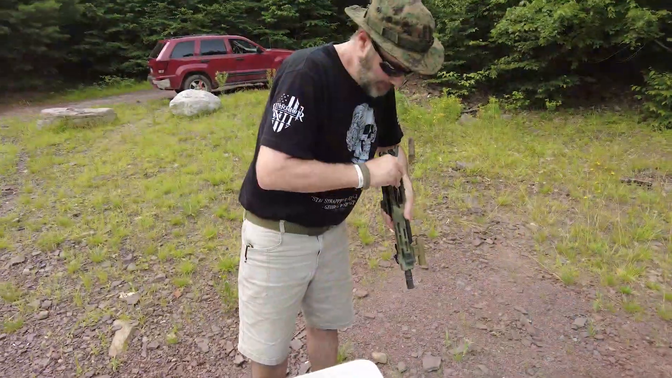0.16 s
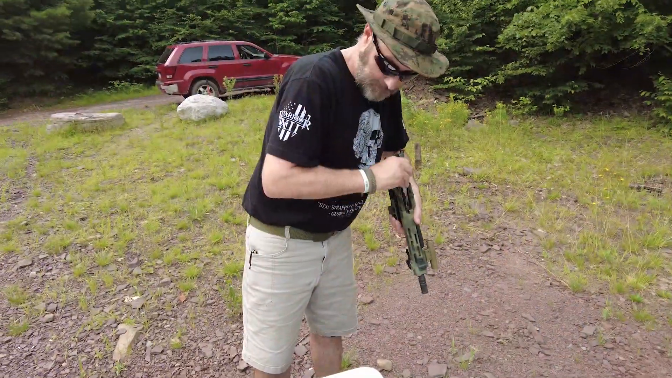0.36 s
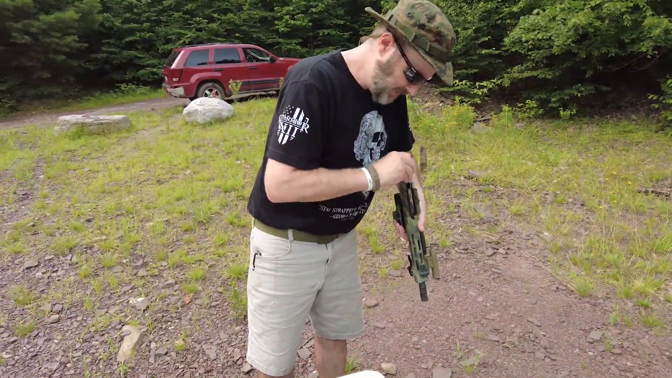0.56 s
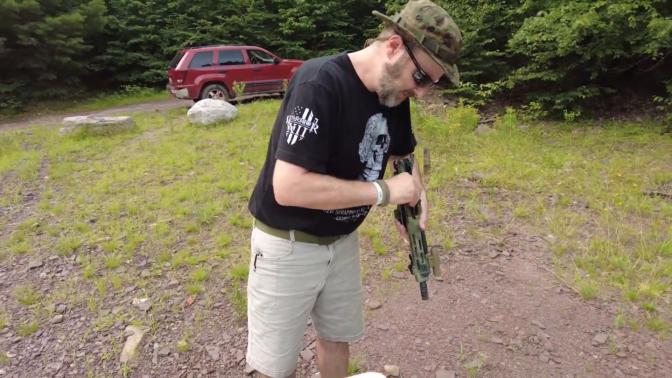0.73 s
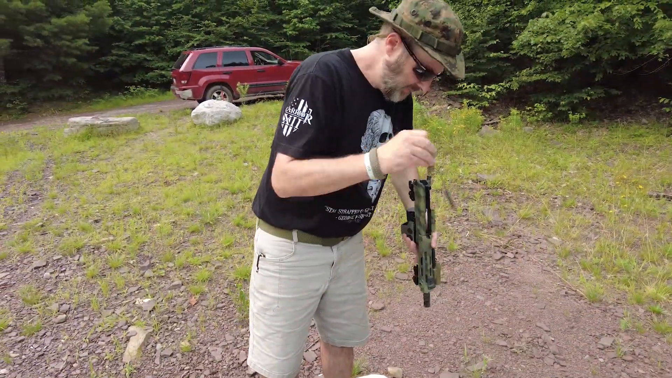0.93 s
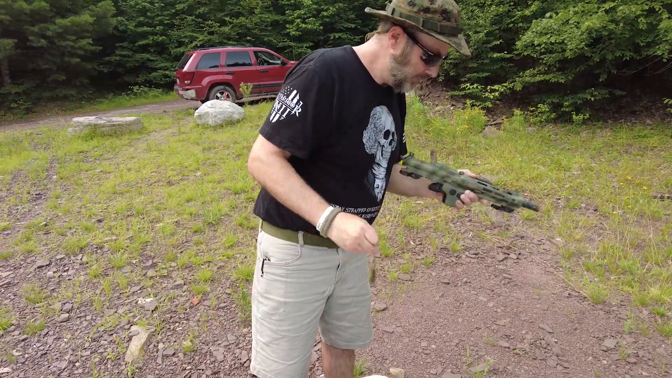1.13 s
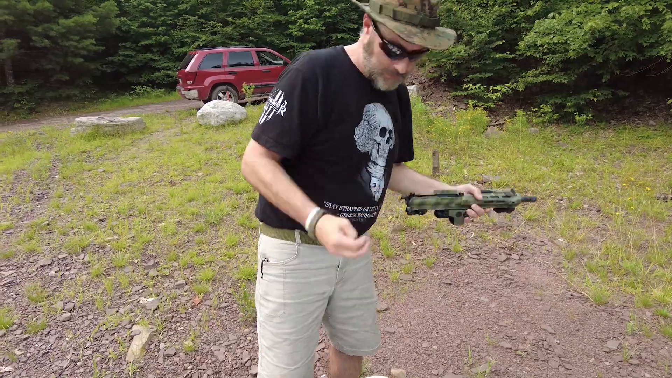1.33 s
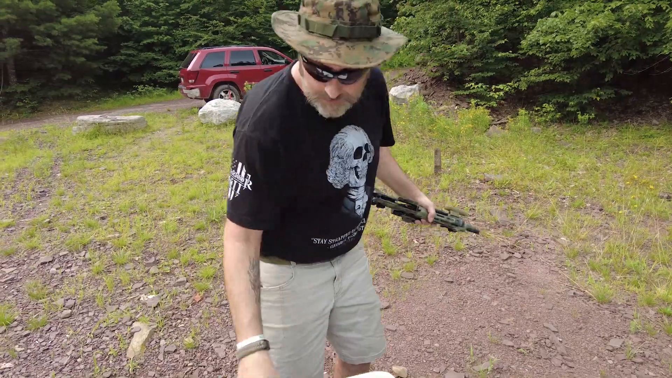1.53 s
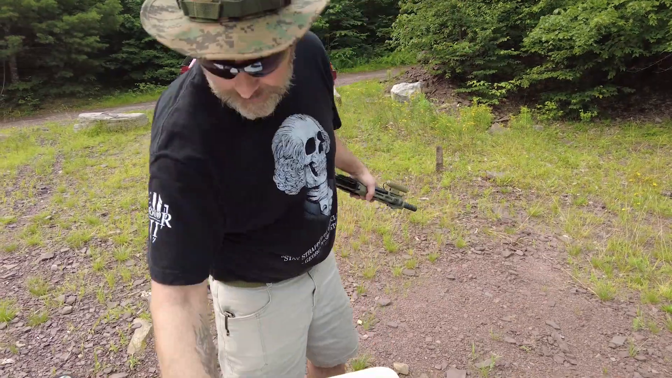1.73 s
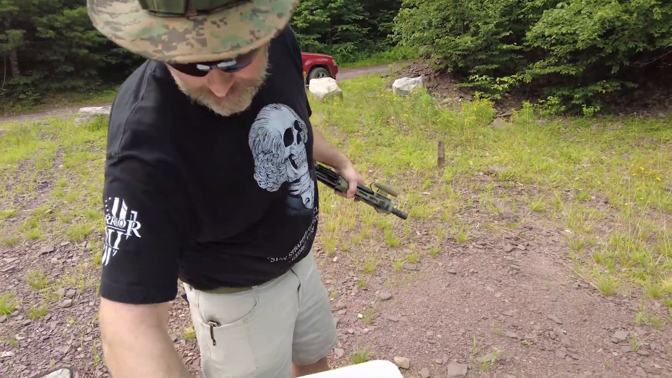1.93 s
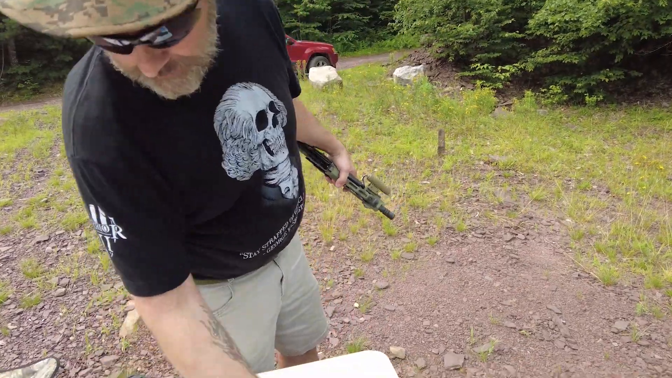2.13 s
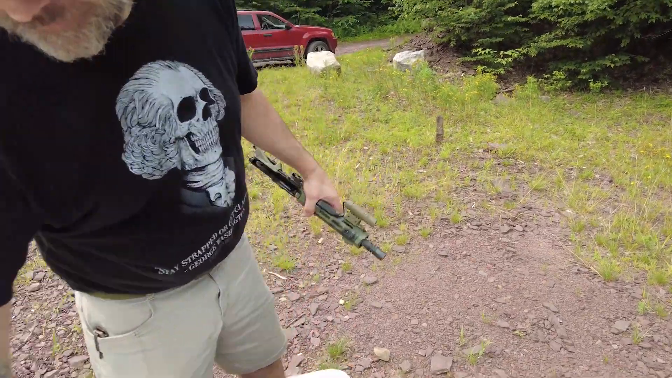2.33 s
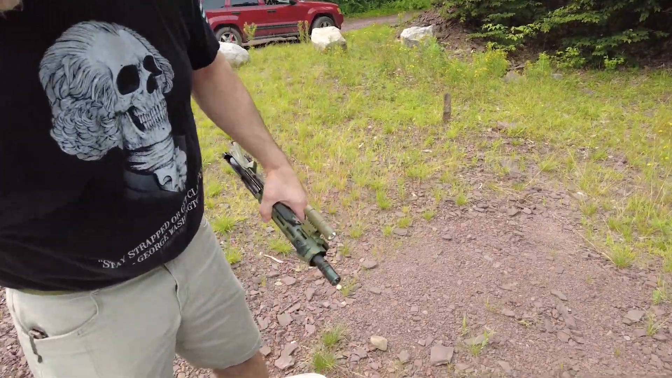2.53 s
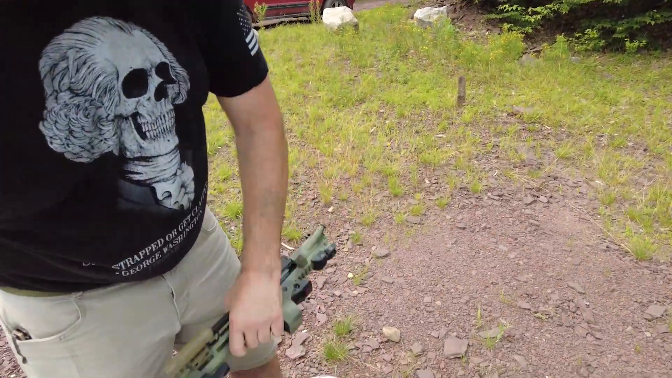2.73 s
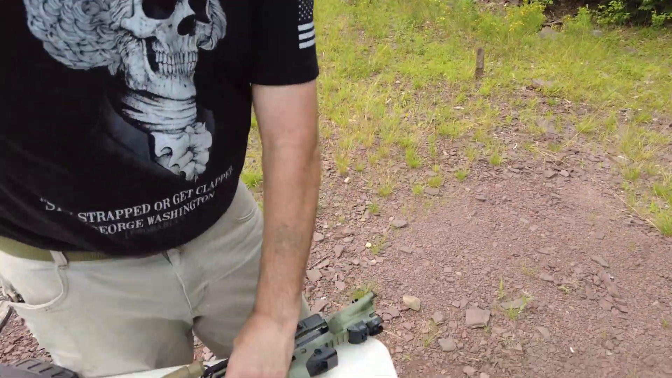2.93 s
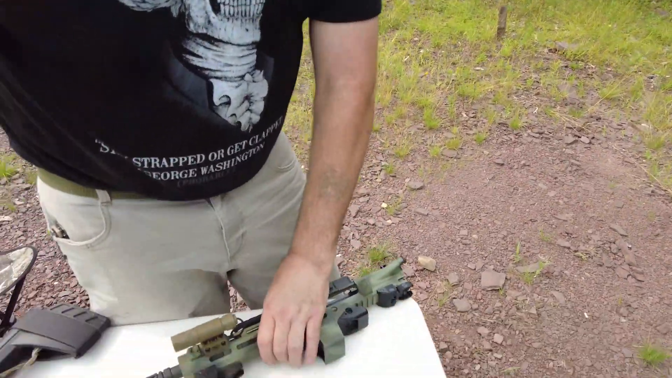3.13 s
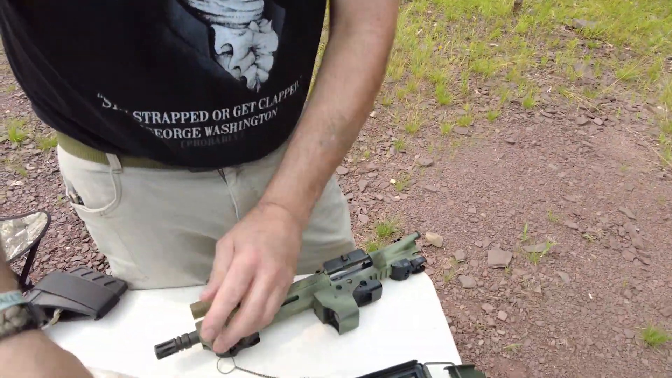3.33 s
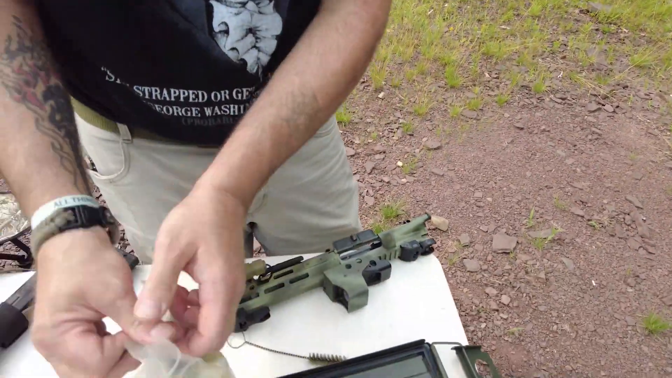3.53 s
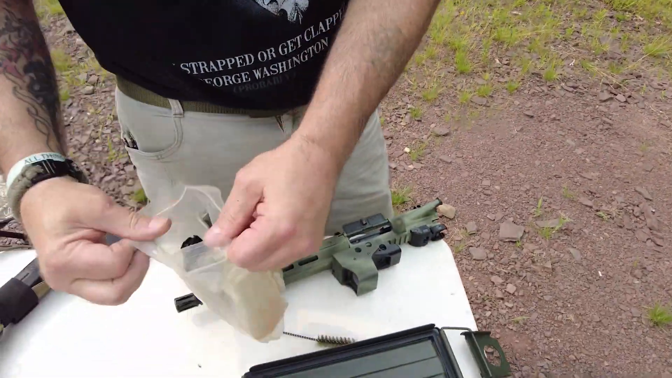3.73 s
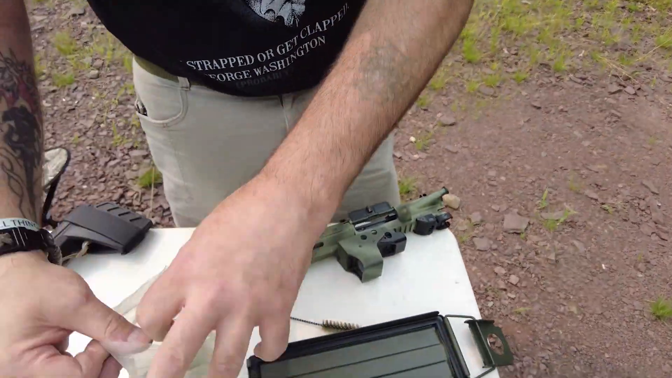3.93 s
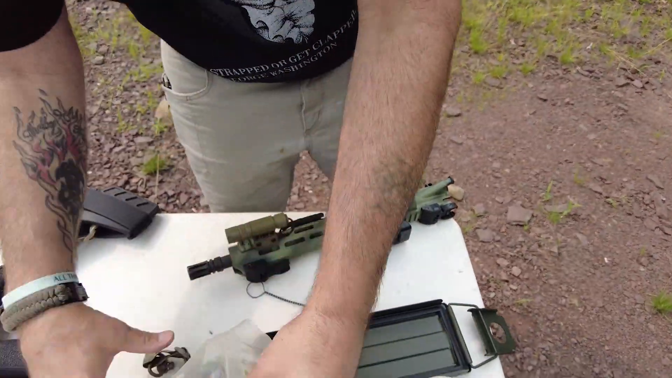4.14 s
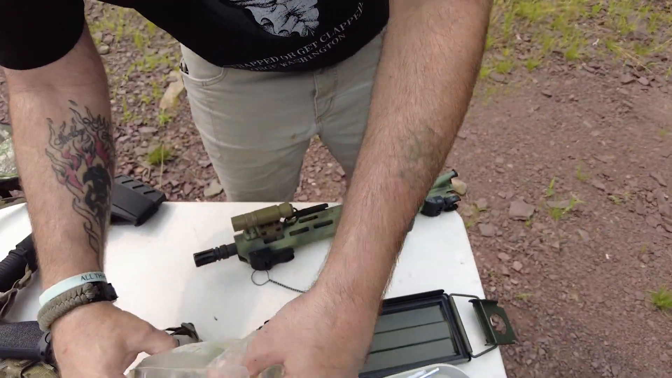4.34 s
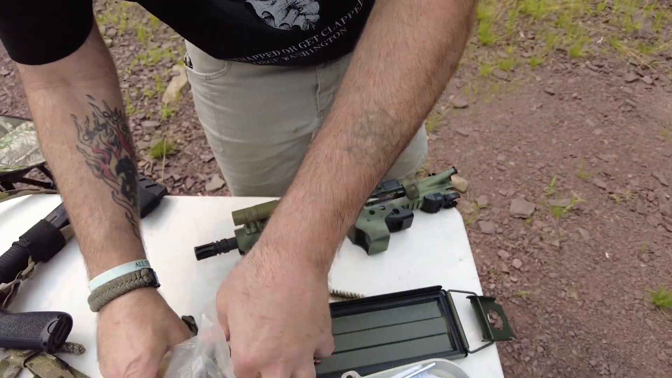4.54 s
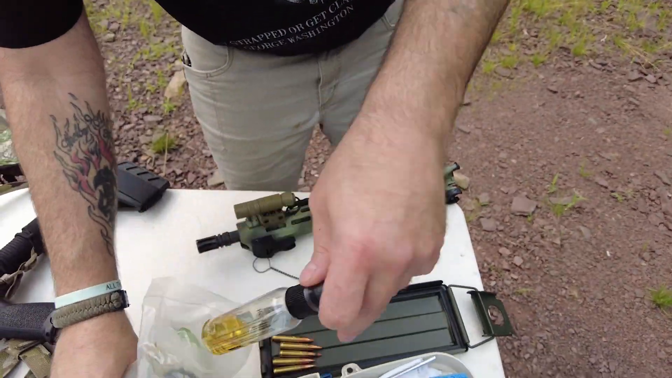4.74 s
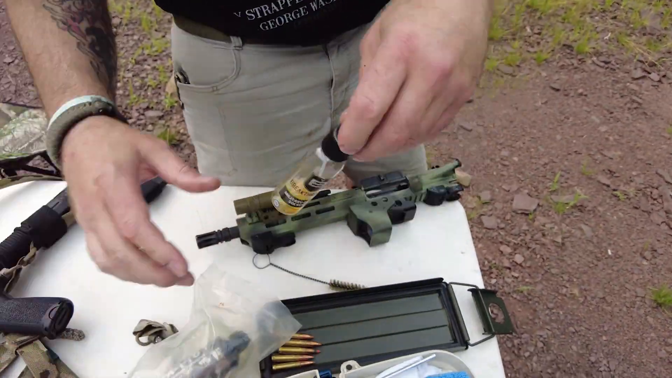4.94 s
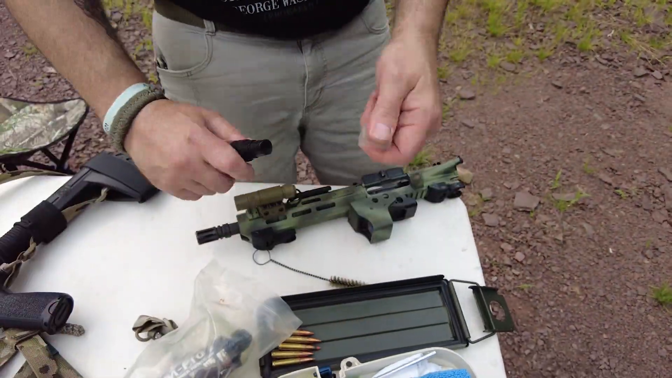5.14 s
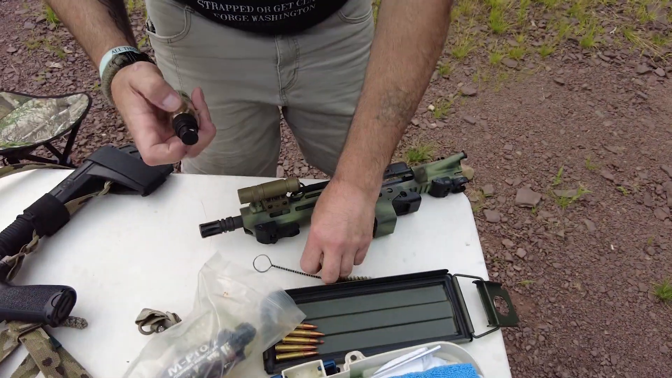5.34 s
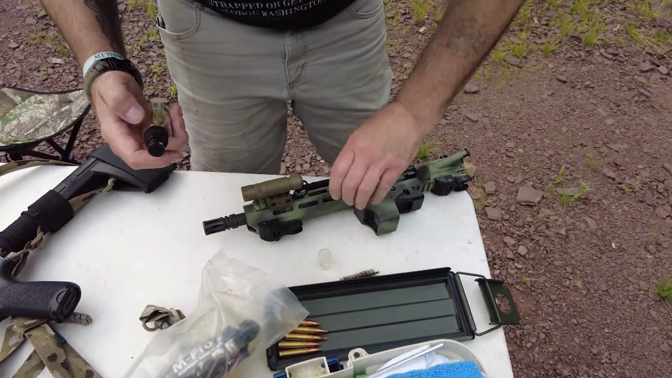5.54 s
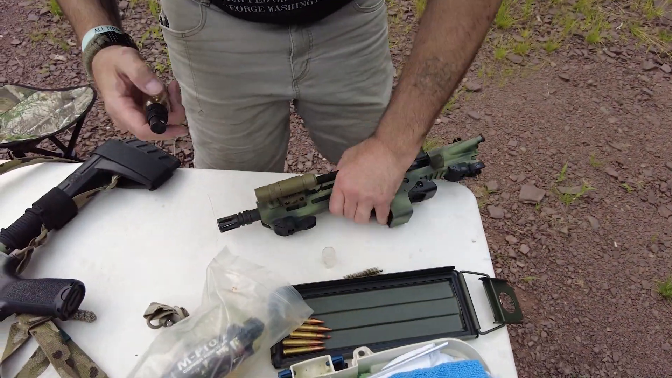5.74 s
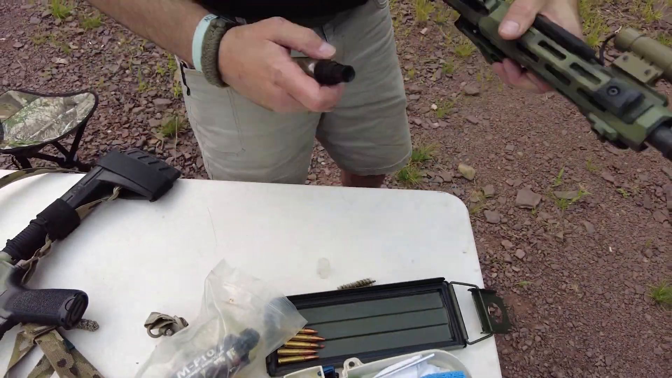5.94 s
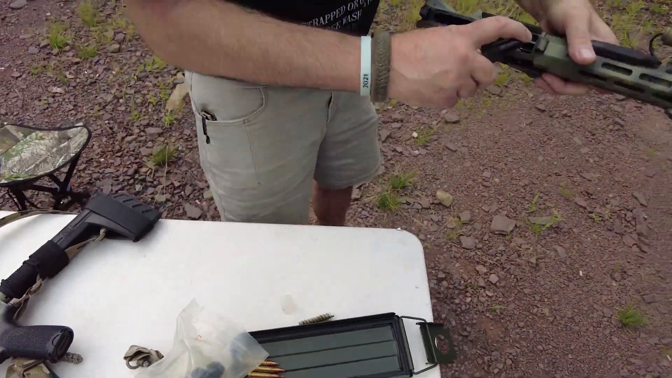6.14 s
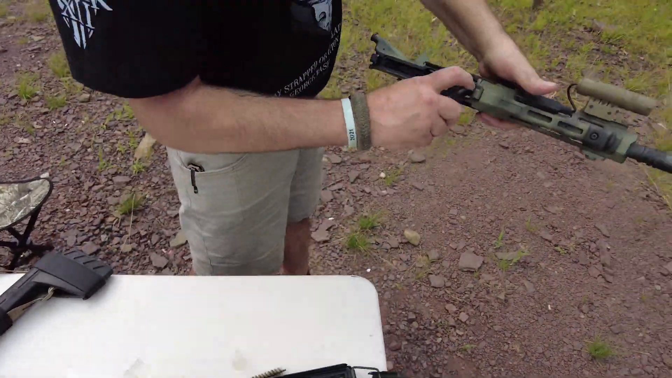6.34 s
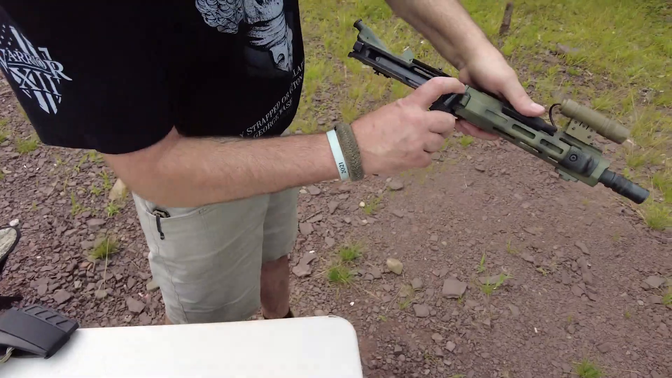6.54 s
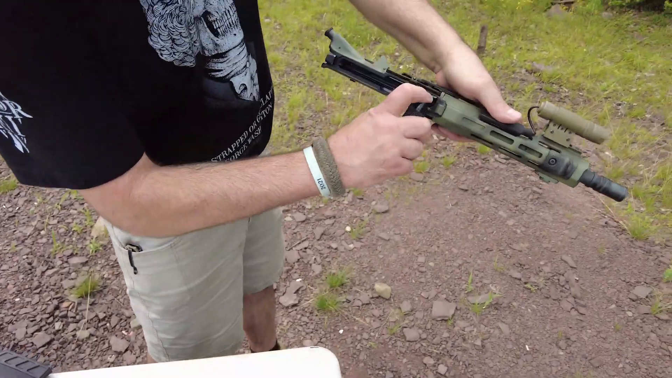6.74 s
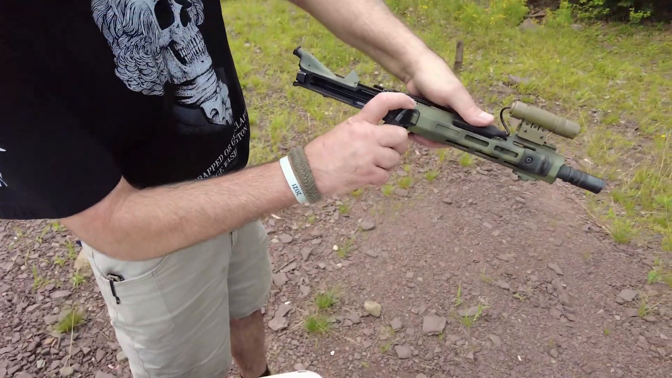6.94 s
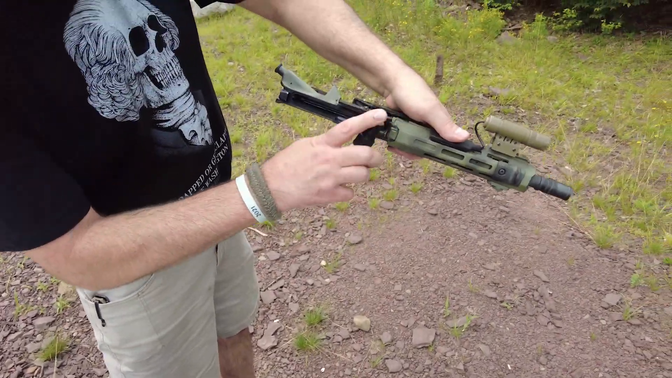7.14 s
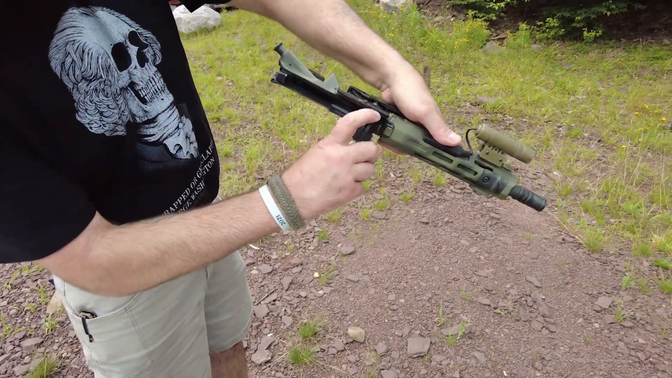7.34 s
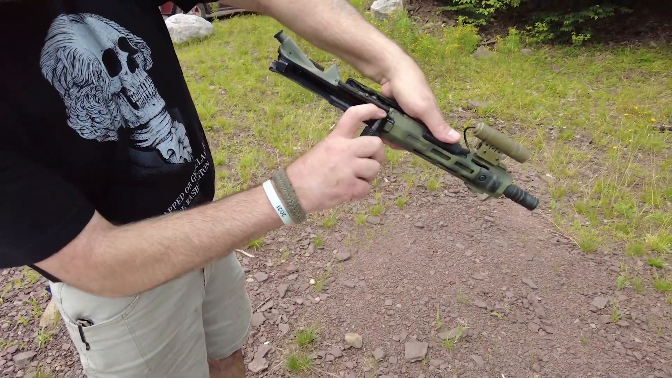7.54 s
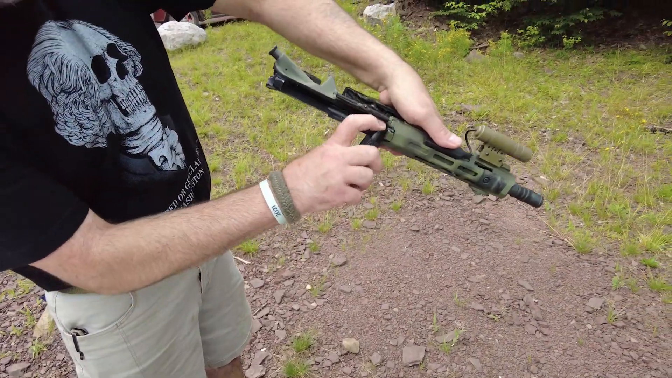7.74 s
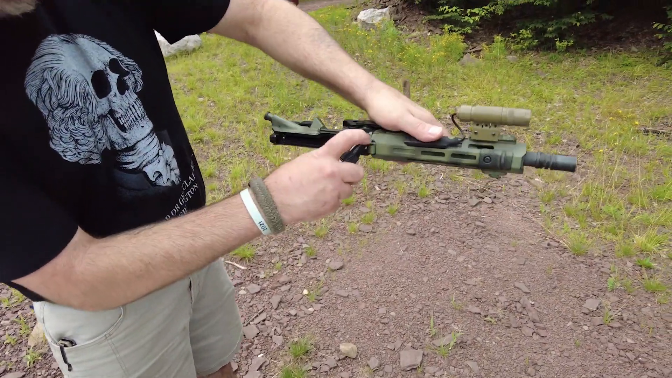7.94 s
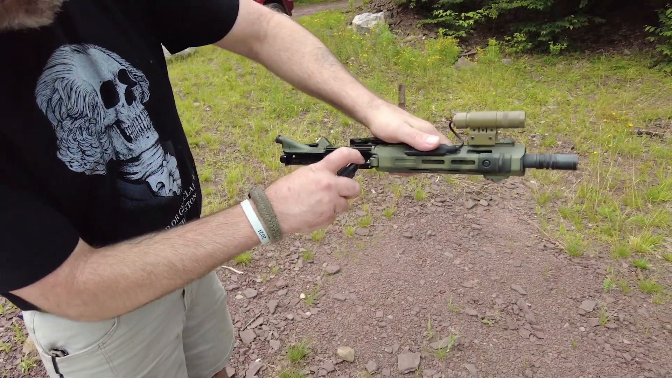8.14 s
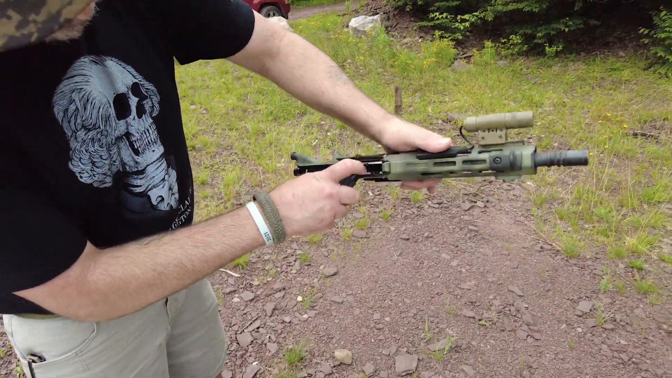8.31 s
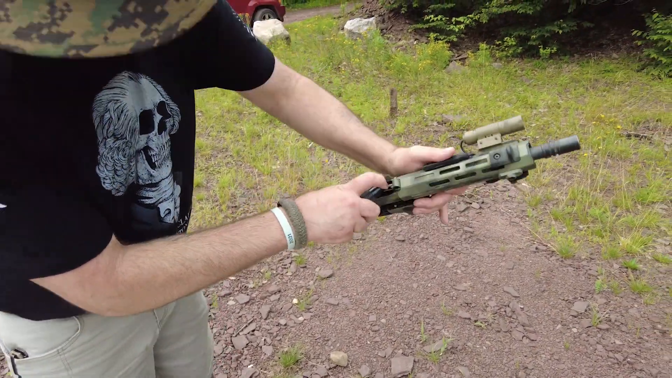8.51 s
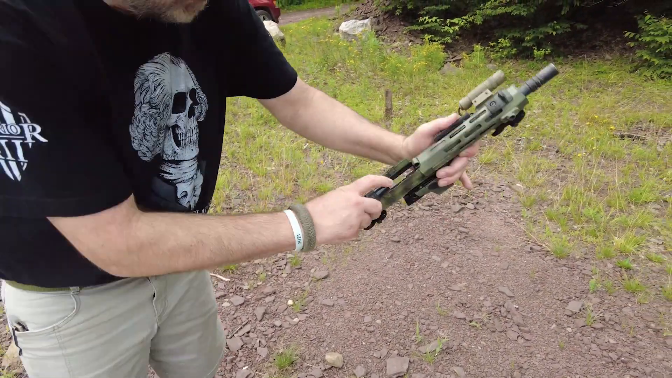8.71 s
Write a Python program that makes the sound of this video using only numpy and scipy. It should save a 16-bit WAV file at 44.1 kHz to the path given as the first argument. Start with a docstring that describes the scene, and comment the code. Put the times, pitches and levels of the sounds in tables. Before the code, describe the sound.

Outdoors, dry and close, a restless low rumble and thin hiss lie quietly beneath everything. From 0.1 to 1 s, rifle steel gives small ticks and thin short rings, clearest around 0.75 s. At 1.6 s a box and gear knock hollowly in a quick cluster; scrapes, pitched taps and further knocks continue to 2.9 s. Around 2.95-3.2 s the rifle is set down: a rapid run of booming table thumps, hard knocks and metallic rattles. Some dragging follows, then from 3.5 to 4.4 s a plastic bag pops, snaps and crinkles, with a last snap at 4.65 s amid rubbing. Steel clinks at 5.0 and 5.2 s; a firm knock and table thump come at 5.4 s. After near quiet, soft short oil puffs run irregularly from 6.7 to 8.5 s, with a bright steel click at 6.8 s and faint ticks until 8.8 s.

```python
"""Outdoors, close to a camera's two microphone ports: a man works on a rifle at a plastic folding table.
Underneath lie a low rumble and a faint hiss, both filtered noise. Hands and cloth rub as grainy noise and tiny slips.
A box and gear knock, a plastic bag pops and crackles, and the table top booms: noise bursts and ringing modes.
The rifle's steel ticks and rings its receiver; a small pump bottle squirts oil in short puffs of noise."""
import sys
import numpy as np
from scipy import signal
from scipy.fft import rfft, irfft, next_fast_len
from scipy.io import wavfile
from scipy.ndimage import uniform_filter1d, map_coordinates

SR = 44100
rng = np.random.default_rng(int(sys.argv[2]) if len(sys.argv) > 2 else 0)


def wav_out(sig):
    """Save sig, one row per channel (or a flat mono array), as 16-bit PCM at SR to the path in sys.argv[1]."""
    wavfile.write(sys.argv[1], SR, np.round(np.clip(np.atleast_2d(sig).T, -1, 1) * 32767).astype(np.int16))


N = 391166
T = np.arange(SR // 4) / SR  # time axis of one short sound [s]
TOP_HZ = 16100  # the camera's band limit
STROKE_ATTACK_S, STROKE_RELEASE_S = 0.0086, 0.12  # time to full pressure; time to die by 60 dB
FIDGET_SCRAPE_DB, FIDGET_RUSTLE_DB = -2, -13.5  # relative to FIDGETING

# Event levels below are nominal: the source functions trim and balance the parts of each sound.
# steel on steel in the action: (time [s], ring level [dB], tick level [dB])
STEEL_TICKS = [(0.086, -65, -61.5), (0.4216, -62, -58.5), (0.5101, -55, -55), (0.739, -45.5, -59.5),
               (0.7786, -50, -50.5), (0.921, -64, -60.5), (0.958, -61.5, -75), (4.991, -43, -60),
               (5.0076, -41, -72), (5.1801, -41.5, -56.5), (6.6428, -61, -71), (6.774, -35.5, -49.5),
               (6.896, -53, -58.5), (7.412, -58.5, -65), (7.6137, -53.5, -69.5), (8.673, -61, -79),
               (8.7378, -58, -77)]
# the rifle lies on the table: (start [s], end [s])
LYING_S = (3.0, 5.9)
# blows on the table top: (time [s], thump level [dB], rattle level [dB])
TABLE_BLOWS = [(2.957, -25.5, -35.5), (3.047, -28.5, -42), (3.0671, -18.5, -26), (3.078, -22, -22.5),
               (3.089, -21, -23.5), (3.116, -24.5, -73.5), (3.149, -27.5, -38), (3.169, -22.5, -30),
               (5.401, -35.5, -35)]
# strokes of the pump bottle: (time [s], level [dB])
SQUIRTS = [(6.735, -52), (6.805, -50.5), (6.936, -51), (7.078, -48), (7.173, -59), (7.494, -50.5),
           (7.636, -54.5), (8.05, -51.5), (8.202, -51.5), (8.358, -51), (8.522, -53)]
# box and gear picked up and put down: (time [s], level [dB], hardness: crack up and knock down by this [dB])
KNOCKS = [(1.5922, -59.5, 10.5), (1.611, -37.5, -1), (1.651, -42, -2), (1.6862, -44, 2.5),
          (1.7006, -47.5, 0.5), (2.0326, -47, 0), (2.0662, -47.5, -3.5), (2.2412, -61, 16),
          (2.4322, -52, -4), (2.771, -40.5, 0), (2.899, -53.5, 0), (2.936, -46.5, 0.5), (3.0546, -34, 2),
          (3.405, -42.5, -11), (3.413, -39, -0.5), (3.466, -51.5, -17), (4.4051, -50, -13),
          (4.636, -45, -2), (5.169, -49.5, 1), (5.392, -32.5, 2), (6.089, -62.5, -7.5), (6.607, -57, 3.5),
          (8.8316, -58, -14)]
# small hard pieces tapped, and the pump bottle's spring pinging at 7.09 and 7.65 s: (time [s], level [dB],
# pitch [Hz])
TAPS = [(1.872, -40, 900), (1.918, -54, 2220), (2.0331, -39.5, 1950), (2.346, -51, 2400),
        (2.853, -39.5, 2720), (2.947, -43, 2770), (5.247, -58.5, 2150), (7.091, -57, 2850),
        (7.648, -57.5, 2900)]
# folds of the plastic bag buckling: (time [s], pop level [dB], crack level [dB])
BAG_SNAPS = [(3.493, -58, -35), (3.4967, -30, -26.5), (3.51, -57.5, -41), (3.522, -40, -37),
             (3.5533, -40, -31), (3.6345, -38, -37.5), (3.7045, -57, -38.5), (3.7144, -58, -40),
             (3.8041, -42.5, -34.5), (3.7972, -35, -33), (3.824, -47, -34.5), (3.8424, -35.5, -38),
             (3.8478, -37, -35), (3.855, -43, -40), (3.8584, -39, -29), (3.882, -43, -48),
             (3.9155, -38, -44.5), (3.921, -42, -50), (3.958, -32, -49), (3.979, -38.5, -32),
             (4.062, -55, -47), (4.1546, -37, -47), (4.252, -28.5, -47), (4.294, -42, -47.5),
             (4.333, -43, -46.5), (4.3529, -38.5, -57), (4.3738, -46, -46.5), (4.6451, -42.5, -42)]
# hands and parts sliding over box, table and rifle:
# (start [s], length [s], scrape level [dB], rustle level [dB])
STROKES = [(0.02, 0.96, -80.5, -71.5), (1.568, 0.17, -54, -70), (2.226, 0.068, -50.5, -60),
           (2.406, 0.14, -55.5, -70), (2.619, 0.28, -47.5, -64), (2.95, 0.064, -45.5, -56),
           (3.046, 0.13, -34, -49), (3.167, 0.094, -47, -61), (3.436, 0.14, -46, -63.5),
           (3.545, 0.11, -47, -55.5), (3.77, 0.094, -45, -55), (4.005, 0.033, -45, -63),
           (4.078, 0.052, -43, -54.5), (4.322, 0.094, -45, -58.5), (4.664, 0.11, -48, -61),
           (4.748, 0.091, -43, -56), (4.952, 0.048, -44, -55), (5.406, 0.083, -44.5, -57),
           (5.716, 0.088, -51, -61.5), (6.429, 0.065, -60.5, -67), (8.39, 0.079, -57.5, -76),
           (8.574, 0.045, -53.5, -73), (8.761, 0.088, -60.5, -81)]
# faint rubbing of hands and clothes between the strokes: (time [s], level [dB])
FIDGETING = [(0.0, -88), (1.56, -102), (1.68, -54.5), (2.64, -63.5), (3.06, -55.5), (4.86, -53.5),
             (5.14, -71), (6.4, -68), (7.16, -79), (8.87, -65)]
# things dragged so that the box sounds hollow: (start [s], length [s], level [dB])
DRAGS = [(1.616, 0.12, -52.5), (3.208, 0.089, -44), (3.404, 0.08, -47), (4.813, 0.048, -48.5),
         (5.406, .09, -51)]

# modes of the rifle's receiver: (frequency [Hz], level [dB], time to die by 60 dB [s])
RECEIVER_MODES = [(2100, -2.5, 0.0043), (3270, 4.5, 0.029), (3450, -3.5, 0.065), (3730, -11, 0.025)]
# modes of the table top: (frequency [Hz], level [dB], time to die by 60 dB [s])
TABLETOP_MODES = [(59, -11, 0.26), (113, -1.5, 0.067), (158.3, 2.5, 0.078), (232, -1, 0.093),
                  (327, -0.5, 0.054), (400, -5, 0.16), (506, -9.5, 0.078), (687, -2.5, 0.032)]
# modes of a stiff film fold popping through: (frequency [Hz], level [dB], time to die by 60 dB [s])
POP_MODES = [(1585, -0.5, 0.022), (2280, -1.5, 0.0071)]

# Spectra, as filter gain.
# hollow knock: (frequency [Hz], level [dB])
KNOCK = [(90, -17), (320, -4.5), (760, 2.5), (1000, -11), (1700, -30.5)]
# dull clack: (frequency [Hz], level [dB])
CLACK = [(600, -46.5), (1100, -6.5), (1600, -3), (2300, -9.5), (2800, -1.5), (4200, -19)]
# bright crack of gear and table rattle, also the bag's crinkles: (frequency [Hz], level [dB])
CRACK = [(1600, -17), (3200, 0.5), (5900, -3), (10000, -11.5), (16000, -19)]
# hollow scrape of box and table: (frequency [Hz], level [dB])
SCRAPE = [(90, -6.5), (300, -3.5), (740, -2), (1000, -13), (1650, -13), (2900, -12), (5000, -27.5)]
# rustle of the sliding surfaces: (frequency [Hz], level [dB])
RUSTLE = [(2200, -33.5), (3400, 0.5), (6000, 6), (16000, -6)]
# oil spray, also the broad tick of steel: (frequency [Hz], level [dB])
SPRAY = [(700, -24), (1500, -10.5), (3300, -1.5), (6000, -3), (16000, -4)]
# crack of plastic film: (frequency [Hz], level [dB])
FILM = [(550, 1), (1050, -7), (5000, 1.5), (16000, -10.5)]
# outdoor rumble: (frequency [Hz], level [dB])
RUMBLE = [(30, 3.5), (150, 0.5), (260, -5), (500, -23.5), (900, -34), (1600, -57.5)]
# faint hiss: (frequency [Hz], level [dB])
HISS = [(500, 0), (16000, -5.5)]
# phase by which the left port leads for sounds from the table, before the bass taper:
# (frequency [Hz], phase [rad])
PORT_PHASE = [(0, -0.5), (1550, 1.5), (2330, 1.83), (3190, 0.32), (16500, 1.58)]


def amp(db):
    """Decibels to gain."""
    return 10 ** (np.asarray(db) / 20)


def unit(x):
    """Scale to rms 1."""
    return x / np.sqrt(np.mean(x ** 2) + 1e-20)


def sized(x, db):
    """Give a short sound the energy of 10 ms at this level."""
    return amp(db) * unit(x) * np.sqrt(SR / 100 / x.shape[-1])


def wobble(rate):
    """A smooth random curve, rate knots a second."""
    knots = rng.standard_normal(int(N * rate / SR) + 4)
    return map_coordinates(knots, [np.arange(N) * rate / SR])


def colour(x, points):
    """Causal minimum-phase filter with the gain of the (Hz, dB) points, falling off beyond both ends."""
    n = x.shape[-1]
    m = 2 * next_fast_len(n // 2 + 2048)
    hz, db = np.transpose(points)
    grid = np.log(np.fft.rfftfreq(m, 1 / SR) + 1)
    beyond = np.abs(grid - np.clip(grid, np.log(hz[0]), np.log(hz[-1])))
    gain = amp(np.interp(grid, np.log(hz), db) - 20 * beyond)
    # folding the cepstrum onto positive times gives minimum phase
    cepstrum = irfft(np.log(gain), m)
    cepstrum[1:m // 2] *= 2
    cepstrum[m // 2 + 1:] = 0
    response = np.exp(rfft(cepstrum))
    return irfft(rfft(x, m) * response, m)[..., :n]


def uneven(spectrum, count, scatter_db):
    """Scatter a spectrum at random over count log-spaced frequencies."""
    hz, db = np.transpose(spectrum)
    grid = np.geomspace(hz[0], hz[-1], count)
    shape = np.interp(np.log(grid), np.log(hz), db) + scatter_db * rng.standard_normal(count)
    return np.column_stack([grid, shape])


def pair(n, side_db):
    """Noise at two microphone ports: a common part and an opposed part, side_db relative to it."""
    mid, side = rng.standard_normal((2, n))
    return np.array([mid + amp(side_db) * side, mid - amp(side_db) * side])


def add(track, s, x):
    """Mix x into the track at time s."""
    part = track[:, round(s * SR):][:, :x.shape[-1]]
    part += x[..., :part.shape[-1]]


def burst(spectrum, t60, spike, side_db, uneven_db=4):
    """A sharp push and a dense, quickly dying ring; each spot that is hit favours other frequencies."""
    x = pair(len(T), side_db) * amp(-60 * T / t60)
    x[:, 0] += spike * rng.choice([-1, 1])
    return colour(x, uneven(spectrum, 14, uneven_db))


def ring(modes, scatter_db, spread, damping=1, detune=0):
    """Modes struck at scattered strengths and pitches; their phases differ between the ports."""
    x = 0
    for hz, db, t60 in modes:
        shifted_hz = hz * (1 + detune * rng.standard_normal())
        phase = 2 * np.pi * shifted_hz * T + spread * rng.standard_normal((2, 1))
        onset = 1 - np.exp(-4 * hz * T)
        fade = amp(-60 * damping * T / t60) * onset
        strength = rng.choice([-1, 1]) * amp(db + scatter_db * rng.standard_normal())
        x = x + strength * fade * np.sin(phase)
    return x


def rebound(s, flight_s, loss_db):
    """A loose part touches twice: (s, dB) of the blow and of its weaker rebound."""
    flight = flight_s * np.exp(0.28 * rng.standard_normal())
    return [(s, 0), (s + flight, -loss_db)]


def pressure(start, length):
    """A stroke presses in, holds and lets go."""
    t = np.arange(N) / SR - start
    attack = np.clip(t / STROKE_ATTACK_S + .5, 0, 1)
    return attack * amp(-60 * np.clip((t - length) / STROKE_RELEASE_S, 0, 2))


def slips(hz, octaves, cycles, count):
    """Tiny slips of uneven size, count a second, each ringing briefly at its own pitch."""
    events = count * N // SR
    pitch, size, skew = rng.standard_normal((3, events, 1))
    age = np.arange(SR // 60)  # samples since each slip
    at = (rng.integers(N, size=(events, 1)) + age).ravel()
    turns = hz * 2 ** (octaves * pitch) * age / SR
    fade = amp(5 * np.minimum(size, 2) - 60 * turns / cycles)
    # each slip is skewed in phase between the ports
    grains = [fade * np.sin(2 * np.pi * turns + side * skew / 4) for side in (1, -1)]
    return unit(np.array([np.bincount(at, g.ravel(), N)[:N] for g in grains]))


def friction(spectrum, grain_rate, grain_db, side_db, patchy_db, snap):
    """Sliding surfaces catch and slip in fine grains, with scattered snaps; the colour shifts as they move."""
    starts = (rng.random(N) < 50 / SR) * rng.exponential(size=N)  # about 50 snaps a second
    snaps = signal.lfilter([1], [1, -np.exp(-1 / (.0016 * SR))], starts)  # 1.6 ms decay
    catches = amp(grain_db * wobble(grain_rate)) + snap * snaps
    z = signal.stft(pair(N, side_db) * catches, nperseg=512)[2]
    # random gains smoothed over frequency, then time
    field = uniform_filter1d(rng.standard_normal(z.shape[1:]), size=4, axis=0)
    field = uniform_filter1d(field, size=9, axis=1)
    x = signal.istft(z * amp(patchy_db * unit(field)), nperseg=512)[1][:, :N]
    return unit(colour(x, spectrum))


def outdoors():
    """The far background: a restless low rumble, nearly mono, under a thin even hiss."""
    swell_db = 1.1 * wobble(4)
    rumble = unit(colour(pair(N, side_db=-21.0), RUMBLE)) * amp(swell_db - 55.5)
    hiss = unit(colour(pair(N, side_db=0.0), HISS)) * amp(-73.5)
    return rumble + hiss


def rubbing():
    """A stroke sounds the hollow box and table (scrape) and the surfaces themselves (rustle)."""
    fidget = amp(np.interp(np.arange(N) / SR, *np.transpose(FIDGETING)))
    scraping, rustling = amp(FIDGET_SCRAPE_DB) * fidget, amp(FIDGET_RUSTLE_DB) * fidget
    for start, length, scrape_db, rustle_db in STROKES:
        press = pressure(start, length)
        scraping = np.maximum(scraping, amp(scrape_db) * press)
        rustling = np.maximum(rustling, amp(rustle_db) * press)
    scrape = friction(SCRAPE, grain_rate=500, grain_db=3.5, side_db=-14.0, patchy_db=2.5, snap=1)
    scrape = unit(scrape + amp(-2) * slips(hz=1800, octaves=.55, cycles=22, count=220))
    rustle = friction(RUSTLE, grain_rate=670, grain_db=4.5, side_db=-9.0, patchy_db=2.5, snap=2.5)
    jerk_db = 2.54 * wobble(45)  # a hand never slides evenly
    return amp(jerk_db) * (scraping * scrape + rustling * rustle)


def dragging():
    """Slips ring the hollow box, each at its own pitch."""
    press = sum(amp(db) * pressure(start, length) for start, length, db in DRAGS)
    return press * slips(hz=718, octaves=.36, cycles=14, count=350)


def bag(settle_s=.016, crinkle_db=-18, scatter_db=3, count=5):
    """Each fold pops at two pitches and cracks; smaller creases crinkle as the film settles."""
    out = np.zeros((2, N))
    for s, pop_db, crack_db in BAG_SNAPS:
        # both flanks of the fold pop
        pop = sum(ring(POP_MODES, scatter_db=3, spread=.3, detune=.15) for _ in range(2))
        add(out, s, sized(pop, pop_db))
        crack = burst(FILM, t60=0.013, spike=3.6, side_db=-6.5)
        add(out, s, sized(crack, crack_db))
        waits = rng.exponential(settle_s, count)
        sizes_db = rng.normal(crinkle_db, scatter_db, count)
        for wait, size_db in zip(waits, sizes_db):
            crinkle = burst(CRACK, t60=0.0037, spike=9.5, side_db=4)
            add(out, s + wait, sized(crinkle, crack_db + size_db))
    return out


def taps(cycles=26):
    """A tapped piece or the pinging pump spring gives one pitched ring, dying by 60 dB in so many cycles, over
    a dull clack."""
    out = np.zeros((2, N))
    for s, db, hz in TAPS:
        tone = ring([(hz, 0, cycles / hz)], scatter_db=0, spread=.2)
        clack = burst(CLACK, t60=.025, spike=2, side_db=-9.5)
        add(out, s, sized(tone, db) + sized(clack, db - 7.5))
    return out


def contact(knock_db, clack_db, crack_db):
    """Plastic gives a hollow knock, a clack and a bright crack, which dies soonest."""
    hardness = amp(0.163 * (crack_db - clack_db))  # a harder contact also cracks higher
    crack_spectrum = [(hz * hardness, db) for hz, db in CRACK]
    knock = burst(KNOCK, t60=0.049, spike=1.4, side_db=-19.5)
    clack = burst(CLACK, t60=0.049, spike=2.8, side_db=-18.0)
    crack = burst(crack_spectrum, t60=0.021, spike=3.4, side_db=-5.5)
    return sized(knock, knock_db) + sized(clack, clack_db) + sized(crack, crack_db)


def gear():
    """Soft contacts mostly knock, hard ones mostly crack; each rebounds once."""
    out = np.zeros((2, N))
    for start, level_db, hard_db in KNOCKS:
        for s, db in rebound(start, flight_s=.007, loss_db=8):
            add(out, s, amp(level_db + db - 0.5) * contact(-hard_db, 0, hard_db))
    return out


def table():
    """At each blow the table top booms, knocks and clacks, and the rifle's metal parts rattle on it."""
    out = np.zeros((2, N))
    for s, thump_db, rattle_db in TABLE_BLOWS:
        boom = ring(TABLETOP_MODES, scatter_db=4.0, spread=0.076, detune=0.028)
        knock = burst(KNOCK, t60=0.049, spike=1.0, side_db=-12.5)
        clack = burst(CLACK, t60=0.026, spike=2.2, side_db=6.5)
        crack = burst(CRACK, t60=0.042, spike=5.5, side_db=-2)
        metal = ring(RECEIVER_MODES, scatter_db=3, spread=.6, detune=.03)
        add(out, s, sized(boom, thump_db - .5))
        add(out, s, sized(knock, thump_db - 12))
        add(out, s, sized(clack, thump_db - 18.0))
        add(out, s, sized(crack, rattle_db - 5.0))
        add(out, s, sized(metal, rattle_db - 15.0))
    return out


def from_left(x, louder_db=0.4, bass_hz=700):
    """Place the work a little left by phase and level; toward 0 Hz the ports come into phase."""
    hz = np.fft.rfftfreq(N, 1 / SR)
    lead = np.interp(hz, *np.transpose(PORT_PHASE)) * np.minimum(hz / bass_hz, 1)
    side = np.array([[1], [-1]])  # left up, right down by the same amount
    return irfft(rfft(x) * np.exp(.5j * lead * side), N) * amp(louder_db * side)


def squirts(length_s=0.027):
    """Each pump stroke swells and fades through the nozzle, with its own length and colour."""
    out = np.zeros((2, N))
    for s, db in SQUIRTS:
        span = length_s * np.exp(.15 * rng.standard_normal())
        flow = np.sqrt(np.abs(np.sin(np.pi * np.minimum(T / span, 1))))
        nozzle = uneven(SPRAY, 24, 4)
        spray = colour(pair(len(T), side_db=-8.5) * flow, nozzle)
        add(out, s, sized(spray, db - .5))
    return out


def clink(ring_db, tick_db, damping):
    """Steel meets steel: a broad bright tick, a dull clack, and the receiver's ring, damped by a changing grip."""
    grip = damping * np.exp(0.25 * rng.standard_normal())
    modes = ring(RECEIVER_MODES, scatter_db=3, spread=0.26, damping=grip, detune=0.018)
    clack = burst(CLACK, t60=0.044, spike=2.1, side_db=-5)
    tick = burst(SPRAY, t60=0.037, spike=4.7, side_db=-6)
    return sized(modes, ring_db) + sized(tick, tick_db + 6.0) + sized(clack, tick_db - 17.5)


def steel(lying_damping=3, settle_db=-65):
    """Each contact ticks, rings the receiver (shorter while it lies on the table), rebounds and settles."""
    out = np.zeros((2, N))
    for start, ring_db, tick_db in STEEL_TICKS:
        settle = start + 0.022 * np.exp(rng.standard_normal() / 10)
        add(out, settle, clink(settle_db, settle_db, 0.87))
        lying = LYING_S[0] < start < LYING_S[1]
        damping = lying_damping if lying else 1
        for s, db in rebound(start, flight_s=0.0035, loss_db=9):
            add(out, s, clink(ring_db + db, tick_db + db, damping))
    return out


def scene():
    """All the handling, dry in the open air."""
    at_table = gear() + taps() + bag() + table() + rubbing() + dragging()
    return outdoors() + from_left(at_table) + squirts() + steel()


def record(dry):
    """The camera's band limit: a 400 Hz wide slope to silence, centred on TOP_HZ."""
    m = next_fast_len(N + SR // 2)
    hz = np.fft.rfftfreq(m, 1 / SR)
    gain = np.clip((TOP_HZ - hz) / 400 + .5, 0, 1)
    return irfft(rfft(dry, m) * gain, m)[:, :N]


dry = scene()
out = record(dry)
wav_out(out)
```